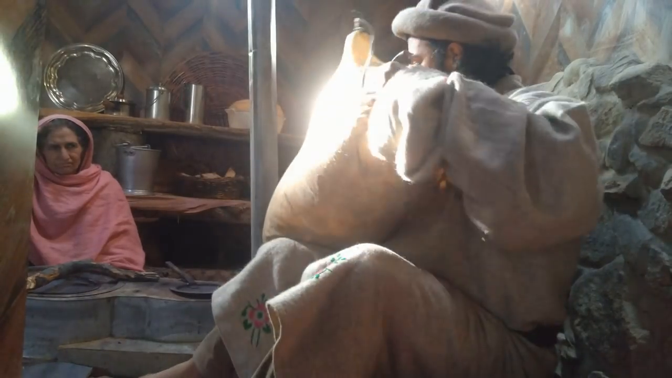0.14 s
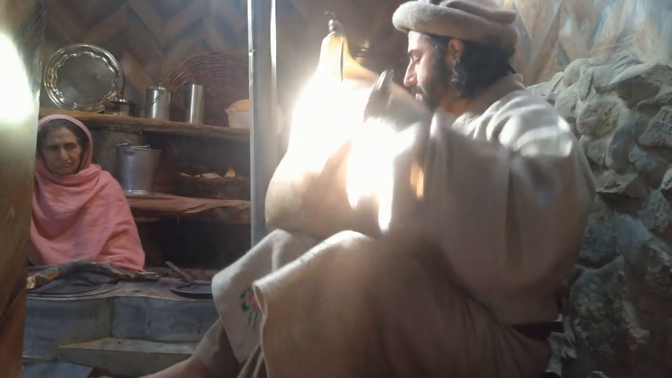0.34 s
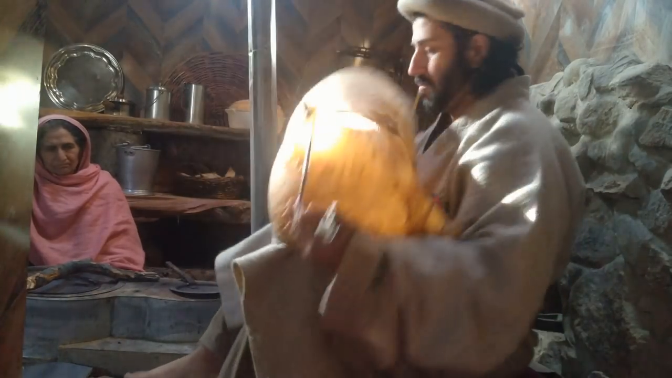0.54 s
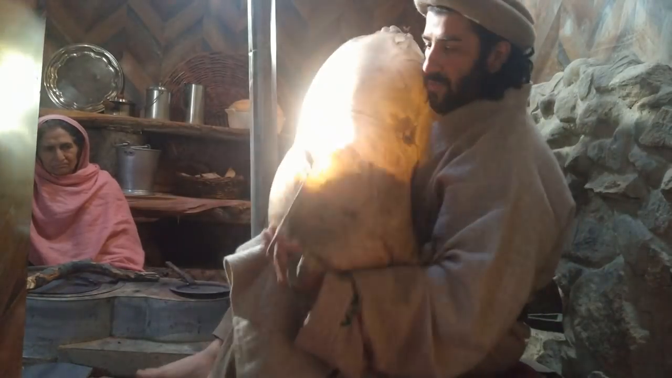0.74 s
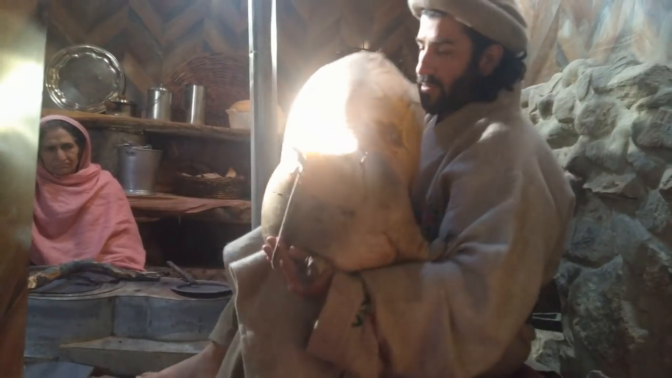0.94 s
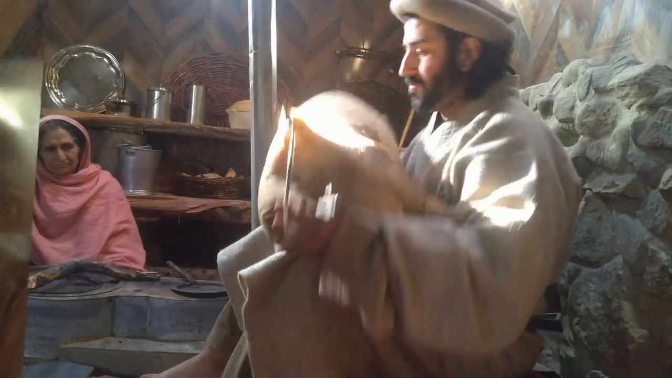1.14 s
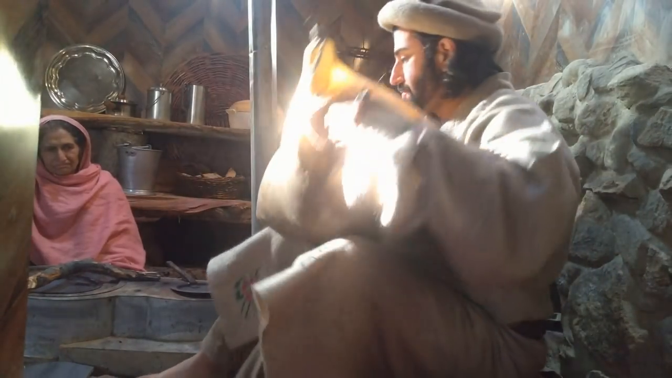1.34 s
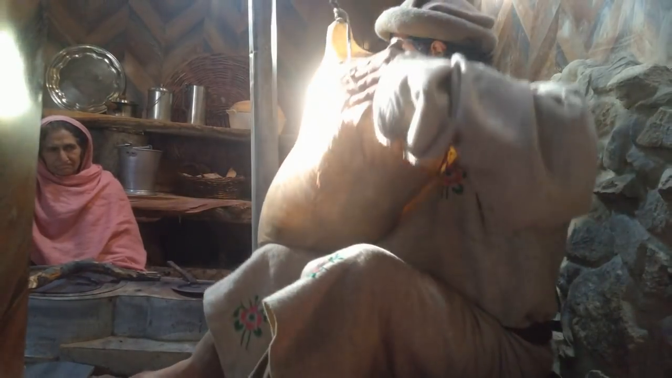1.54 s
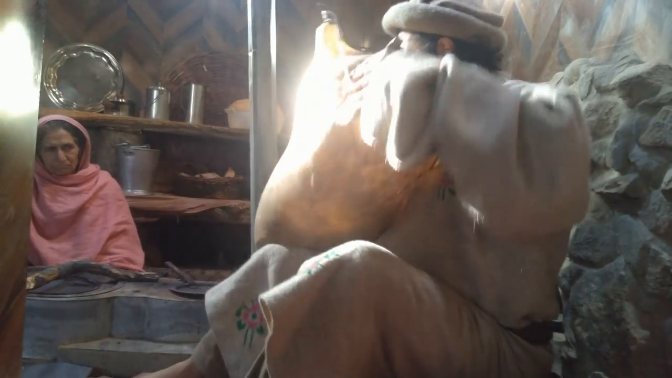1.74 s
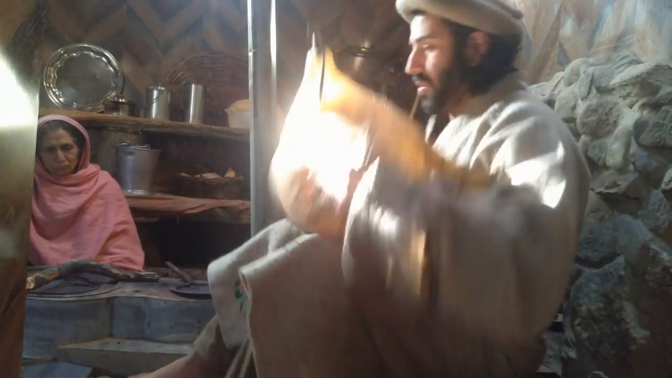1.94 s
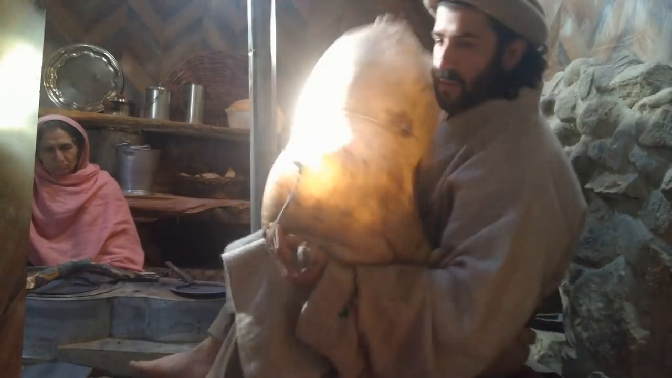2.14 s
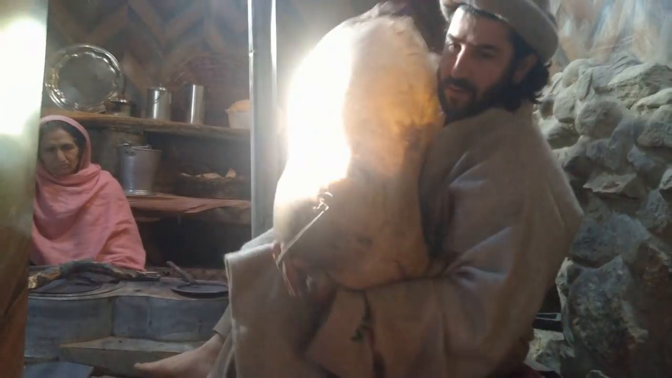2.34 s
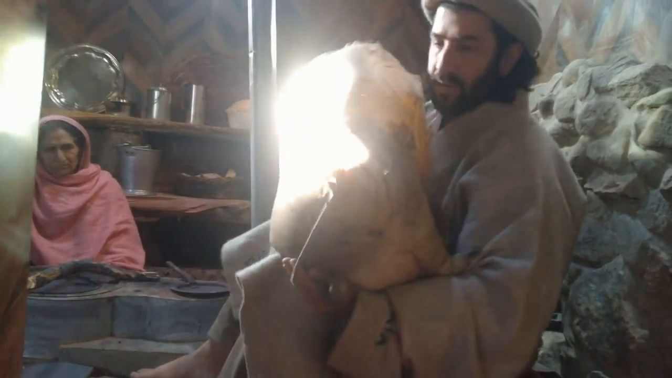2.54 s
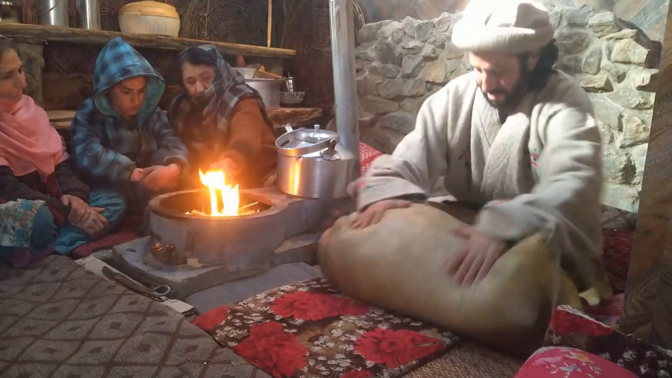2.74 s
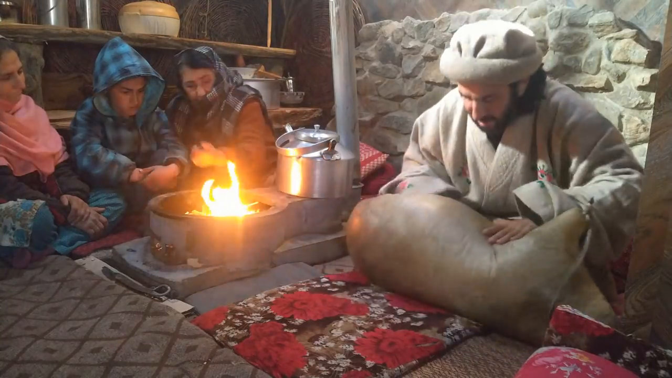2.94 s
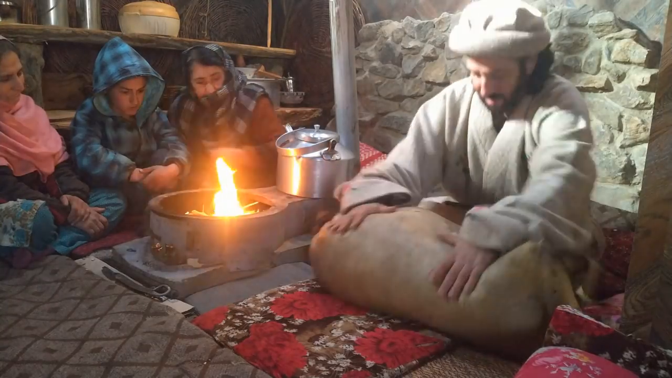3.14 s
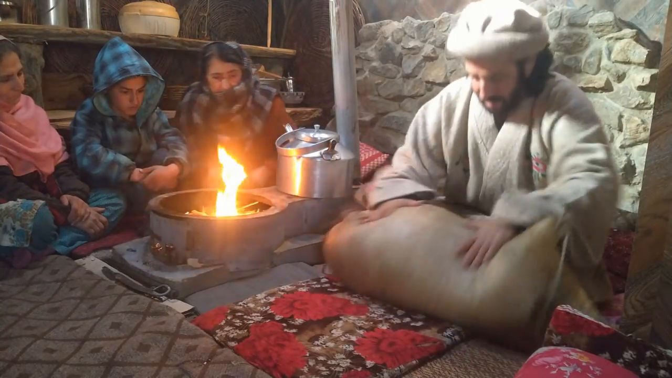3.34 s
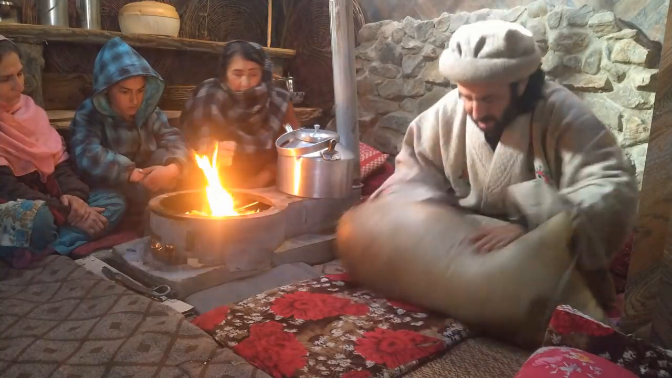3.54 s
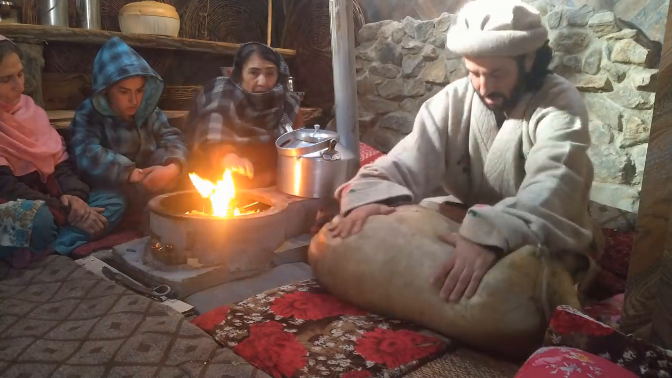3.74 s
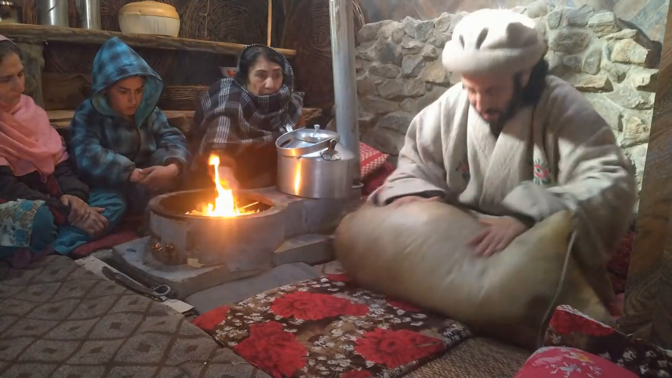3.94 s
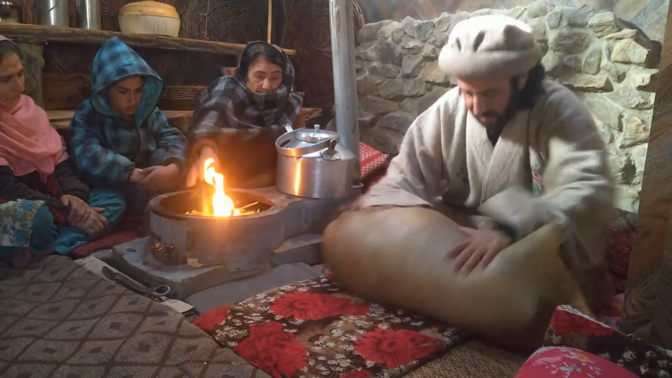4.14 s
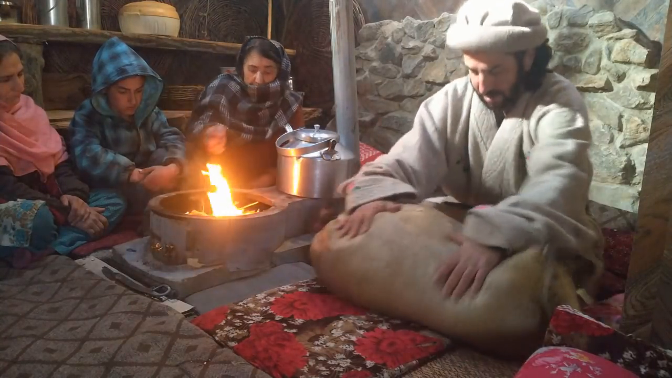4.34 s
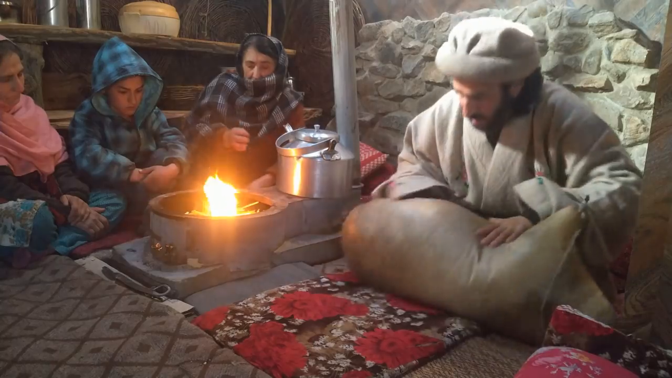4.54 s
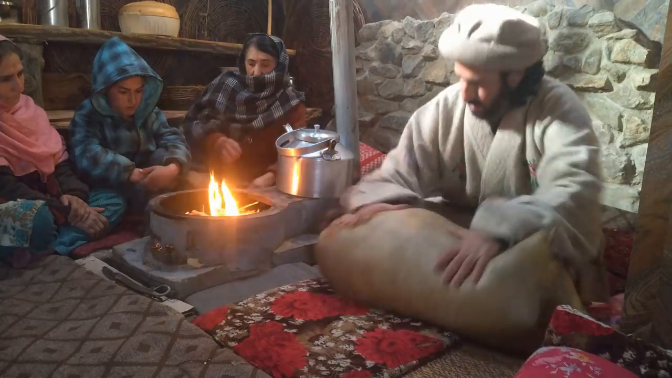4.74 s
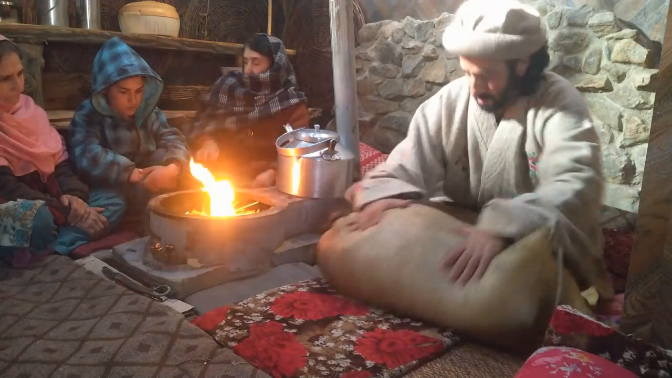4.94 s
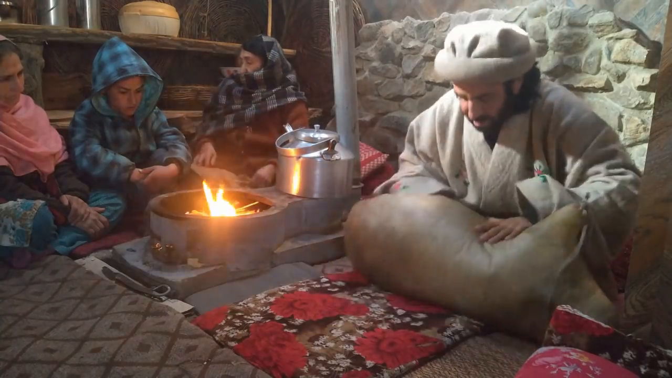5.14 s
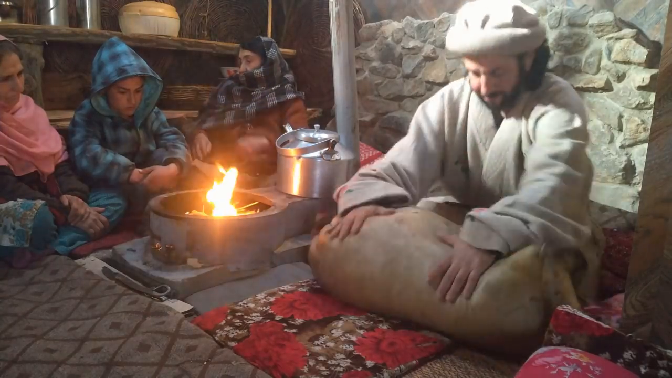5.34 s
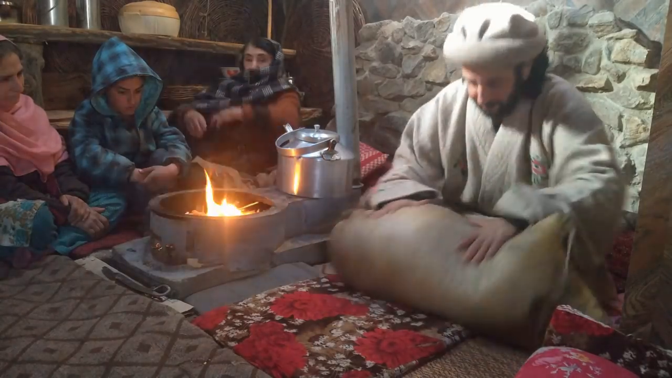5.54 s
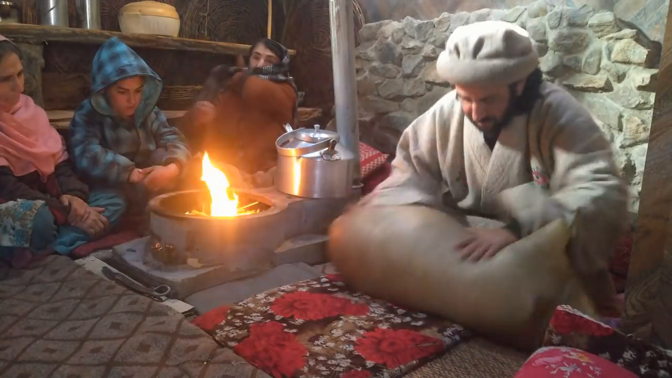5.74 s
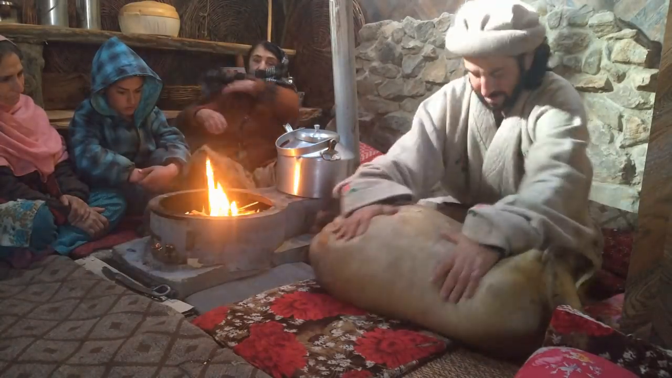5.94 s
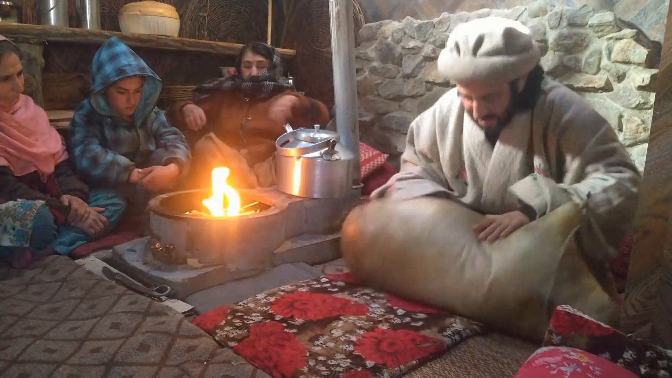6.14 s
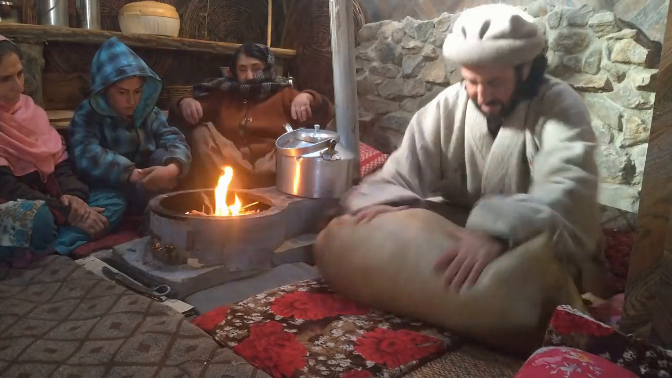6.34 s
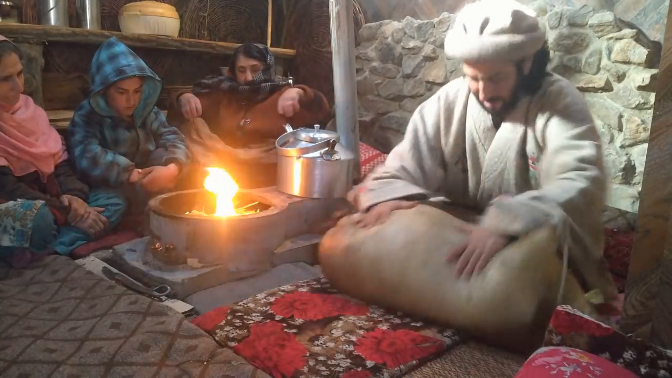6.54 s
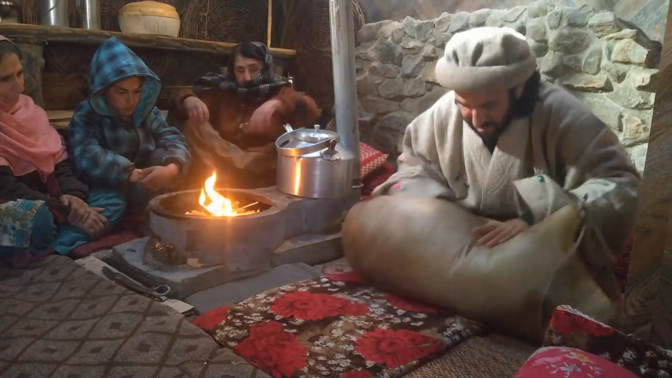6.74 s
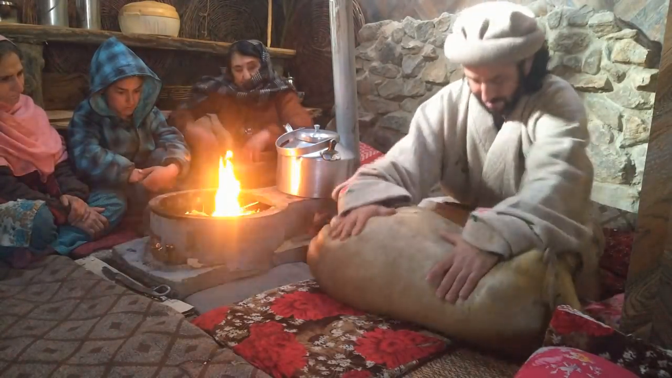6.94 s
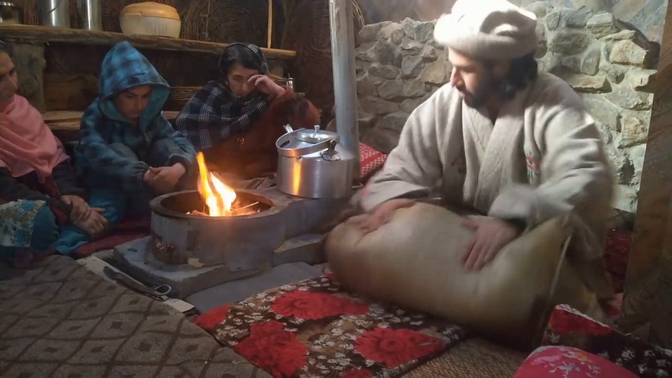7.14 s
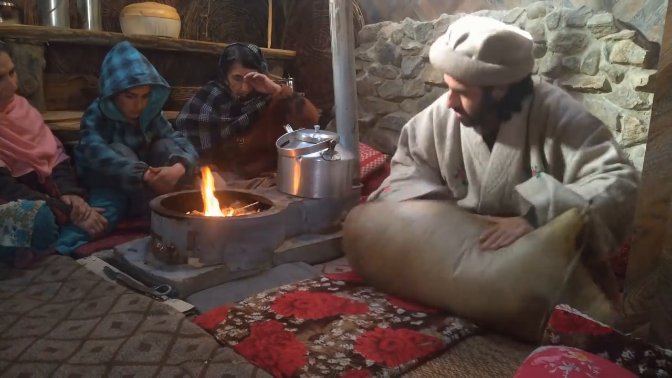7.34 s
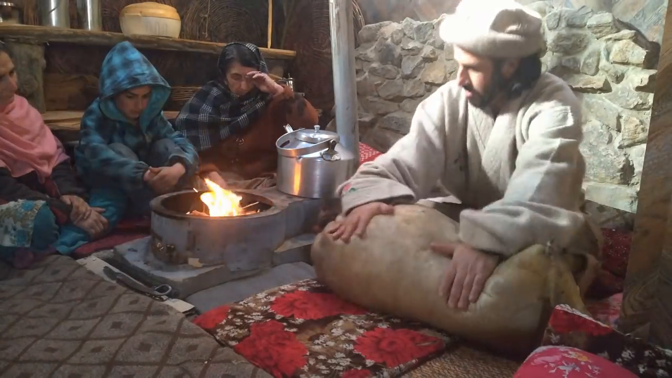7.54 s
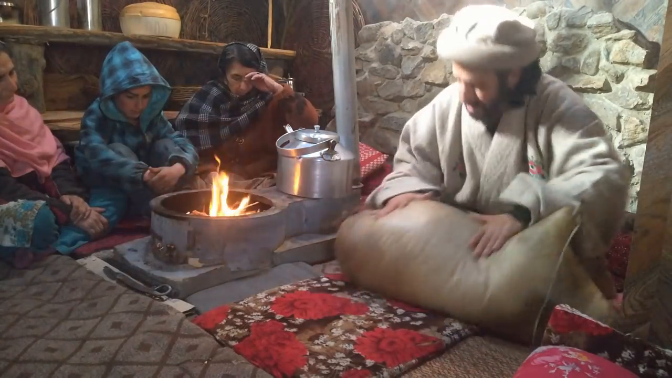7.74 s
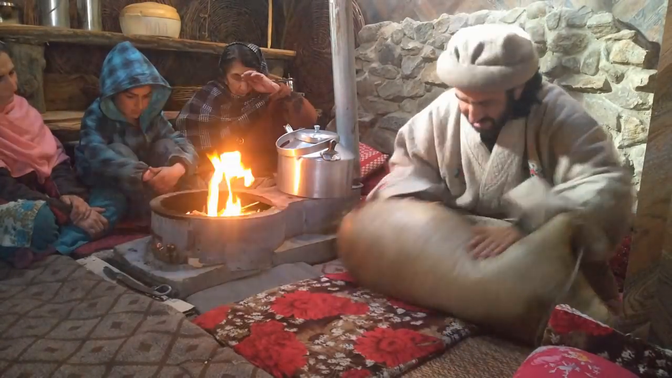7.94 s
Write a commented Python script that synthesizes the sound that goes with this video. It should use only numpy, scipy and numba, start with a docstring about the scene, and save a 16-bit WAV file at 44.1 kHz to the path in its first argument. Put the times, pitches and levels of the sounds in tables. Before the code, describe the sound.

Liquid sloshes in a leather skin bag, tipped slowly on the knees, then rocked faster with deep gulps and slaps in a small quiet room.

```python
"""Liquid churns in a skin bag in a small quiet room: tipped to and fro on the knees, then rocked faster on the floor.
Its trapped air is swarms of dying sine bubbles: deep gulps, a middling splash with gurgles, and fine froth,
all swelling with each stroke. Waves slap the skin as runs of pressure knocks with ringing skin and spray.
Lone bubbles plop and the leather crackles with short noise ticks. Wall echoes, low room resonances
and faint coloured-noise air surround the bag."""
import sys
import numpy as np
from scipy import signal
from scipy.fft import rfft, irfft
from scipy.io import wavfile
from scipy.ndimage import uniform_filter1d
from numba import njit

SR = 44100
rng = np.random.default_rng(int(sys.argv[2]) if len(sys.argv) > 2 else 0)


def materialize(psi):
    """Save the field psi as 16-bit PCM at rate SR to the path in sys.argv[1].

    A 1-D psi becomes a single channel; in a 2-D psi each row is a channel.
    """
    bounded = np.clip(np.atleast_2d(psi).T, -1, 1)
    quanta = np.round(bounded * 32767).astype(np.int16)
    wavfile.write(sys.argv[1], SR, quanta)


N = 357210
TIME = np.arange(N) / SR
FLOOR_FROM_S = 2.64  # from here on the bag lies on the floor


def from_db(db):
    """Decibels to gain."""
    return 10 ** (np.asarray(db) / 20)


def rms_one(x):
    """Scale to unit rms."""
    return x / np.sqrt(np.mean(x ** 2) + 1e-20)


def at_hz(points, hz):
    """Gain of a spectrum, drawn as straight dB lines over log frequency."""
    known_hz, db = np.transpose(points)
    return from_db(np.interp(np.log(np.maximum(hz, 1)), np.log(known_hz), db))


def coloured(x, points):
    """Filter a whole signal with a fixed spectrum."""
    return irfft(rfft(x) * at_hz(points, np.fft.rfftfreq(N, 1 / SR)), N)


def band(x, low_hz, high_hz, order=2):
    """Causal band-pass."""
    sos = signal.butter(order, [low_hz, high_hz], "band", fs=SR, output="sos")
    return signal.sosfilt(sos, x + 1e-18)


def evened(x, span_s):
    """Hold the slow level of a swarm at 1, keeping its grain."""
    size = max(int(span_s * SR), 2)
    power = uniform_filter1d(uniform_filter1d(x * x, size), size)
    return x / np.sqrt(np.abs(power) + 1e-20)


@njit
def bubbles(start, size, hz, t60, rise):
    """Each bubble is a dying sine; a positive rise lifts its pitch as it nears the surface."""
    out = np.zeros(N)
    for k in range(len(start)):
        length, phase = int(t60[k] * SR), 0.
        for i in range(min(length, N - start[k])):
            age = i / length
            phase += 2 * np.pi * hz[k] * (1 + rise * age) / SR
            out[start[k] + i] += size[k] * np.exp(-np.log(1000.) * age) * np.sin(phase)
    return out


def cloud(low_hz, high_hz, count, cycles, spread_db, rise):
    """A swarm of bubbles of random moment, pitch, size and damping, with equal power per Hz."""
    when, pitch, size, damping, sign = rng.random((count, 5)).T
    starts = (when * N).astype(np.int64)
    hz = low_hz * (high_hz / low_hz) ** pitch
    sizes = hz * from_db(-spread_db * np.log(np.maximum(size, .01))) * np.sign(sign - .5)
    t60 = cycles * 2 ** (2 * damping - 1) / hz  # half to double the given cycles
    return bubbles(starts, sizes, hz, t60, float(rise))


# spectrum of the still room: (f/Hz, relative level/dB)
AIR_COLOUR = [(20, -22), (50, -28), (120, -29), (500, 12), (2000, -3), (4200, -24), (8400, -22),
              (12000, -27), (15700, -18)]
AIR_DB = -59


def room_air():
    """Still air is steady noise with the colour of the room."""
    return from_db(AIR_DB) * rms_one(coloured(rng.standard_normal(N), AIR_COLOUR))


def room_echoes(x, t60_s=0.28, level_db=-15, first_echo_s=0.0044, shift_s=.4, count=3):
    """Dense wall reflections, soon soaked up by rugs; their pattern shifts as the liquid moves about."""
    age, wet = TIME[:SR // 2], np.zeros(N)
    for k in range(count):
        decay = from_db(-60 * age / t60_s) * (age > first_echo_s)
        tail = band(rng.standard_normal(len(age)) * decay, 130, 10000)
        tail = tail / np.sqrt(np.sum(tail ** 2))
        # each pattern fades in and out in turn
        nearness = np.sqrt(2 / count) * np.cos(TIME / shift_s * np.pi + np.pi * k / count)
        wet += signal.fftconvolve(x * nearness, tail)[:N]
    return from_db(level_db) * wet


# low resonances of the small room: (f/Hz, width f/Hz, level/dB)
STANDING_WAVES = [(119.4, 16, -14.5), (250, 5.7, -5.5), (303.3, 16.4, 1.5)]


def room_boom(x):
    """Standing waves between the walls ring on a little after each gulp."""
    boom = np.zeros(N)
    for hz, width_hz, db in STANDING_WAVES:
        b, a = signal.iirpeak(hz, hz / width_hz, fs=SR)
        boom += from_db(db) * signal.lfilter(b, a, x)
    return boom


# bright spectrum shared by froth and leather crackle: (f/Hz, relative level/dB)
BRIGHT_COLOUR = [(2800, 1.5), (3300, -3), (4100, -12), (5000, -11.5), (6600, -14.5), (8400, -9.5),
                 (9600, -18.5), (12000, -25.5), (14000, -20.5), (15700, -15)]


def brightened(x):
    """Fine froth and snapping leather get the same bright colour."""
    return coloured(x, BRIGHT_COLOUR)


# creases of leather snapping: (t/s, relative level/dB)
LEATHER_SNAPS = [(.72, -51), (2.151, -37), (2.162, -40), (2.17, -35.5), (2.597, -41)]


def leather_creases(snap_s=0.0059, level_db=-7):
    """A crease gives way with a short bright tick: noise under a sudden, dying envelope."""
    snaps = np.zeros(N)
    for s, db in LEATHER_SNAPS:
        first = int(s * SR)
        snaps[first:] += from_db(db + level_db) * np.exp(-TIME[:N - first] / snap_s)
    crackle = rms_one(band(brightened(rng.standard_normal(N)), 4200, 21550))
    return band(snaps * crackle, 1600, 19000, order=4)


# lone large bubbles: (t/s, relative level/dB, starting pitch f/Hz, 60 dB decay t/s)
LONE_BUBBLES = [(.095, -29, 560, .12), (.187, -26.5, 510, 0.031), (0.431, -36.5, 402, 0.18),
                (0.931, -30, 327, 0.096), (1.126, -30, 460, 0.079), (1.722, -36.5, 328, 0.25),
                (1.795, -31.5, 416, 0.13), (2.055, -29.5, 595, 0.077), (2.152, -27.5, 618, 0.053),
                (2.91, -25.5, 229.6, 0.31), (6.209, -22, 233.4, 0.23)]


def plops(rise=0.056):
    """Single large bubbles break loose as the liquid turns over."""
    s, db, hz, t60 = np.transpose(LONE_BUBBLES)
    ringing = bubbles((s * SR).astype(np.int64), from_db(db), hz, t60, float(rise))
    return band(ringing, 124, 910)


# colour of the bag on the knees, then on the floor: (f/Hz, relative level/dB)
KNEES_COLOUR = [(60, -19), (100, -0.5), (130, 4), (210, -3), (330, -2), (440, -5), (570, -3.5), (740, -10),
                (1100, -11.5), (2000, -18), (2800, -20.5)]
FLOOR_COLOUR = [(60, -25.5), (92, -5), (125, -2), (180, 3), (270, -2), (400, -8), (480, -12), (700, -12.5),
                (1000, -16.5), (1600, -18), (2800, -22.5)]


def through_skin(x):
    """The bag colours what rings inside it, one way on the knees and another on the floor."""
    return np.where(TIME < FLOOR_FROM_S, coloured(x, KNEES_COLOUR), coloured(x, FLOOR_COLOUR))


# waves hitting the skin: (t/s, relative level/dB, central skin pitch f/Hz)
SKIN_HITS = [(0.073, -28, 330), (.899, -21, 98), (1.378, -34, 130), (1.416, -36, 400), (1.547, -26, 300),
             (1.614, -29, 116), (2.313, -29, 150), (2.461, -30, 114), (3.74, -17.5, 119),
             (3.885, -18.5, 128), (4.269, -21, 148), (4.824, -30, 222), (5.377, -8.5, 107),
             (6.927, -24, 170), (6.951, -15, 109), (7.127, -18, 99), (8.082, -19, 160)]


def slaps(gap_s=0.0075, fade_s=0.03, skin_cycles=5, skin_db=-9, knock_db=-2, knock_s=0.00064,
          rebound_s=0.0023, spray_db=-23, spray_s=0.062, count=5):
    """A wave lands as a ragged run of pressure knocks that ring the slack skin and throw a burst of spray."""
    skin, knocks, burst = np.zeros((3, N))
    for s, db, hz in SKIN_HITS:
        gaps, sizes, pitches = rng.uniform(0.53, 1.41, (3, count))
        delay = gap_s * (np.cumsum(gaps) - gaps[0])
        at = ((s + delay) * SR).astype(np.int64)
        force = from_db(db) * np.sqrt(sizes) * np.exp(-delay / fade_s)
        pitch_hz = hz * np.sqrt(pitches)
        skin += bubbles(at, -force, pitch_hz, skin_cycles / pitch_hz, 0.)
        knocks[at[at < N]] += force[at < N]
        spray_age = np.minimum(TIME[:max(N - at[0], 0)], 1)
        burst[at[0]:] += from_db(db + spray_db) * np.exp(-spray_age / spray_s)
    # each knock is a pointed push followed by the pull of the rebound
    lag = np.arange(-SR // 100, SR // 100) / SR
    push_pull = np.exp(-np.abs(lag) / knock_s) - np.exp(-np.abs(lag - rebound_s) / knock_s)
    thump = from_db(knock_db) * signal.fftconvolve(knocks, push_pull, "same") + from_db(skin_db) * skin
    drops = through_skin(cloud(380, 1950, count=12000, cycles=0.85, spread_db=4.5, rise=0))
    spray = evened(band(drops, 430, 2270, order=4), 0.04)
    return band(thump, 81, 1600, order=3) + burst * spray


def swell(start_s, end_s, attack_s, release_s):
    """Exponential attack, hold and release of one wave; it belongs either to the knees or to the floor."""
    away = np.maximum(start_s - TIME, 0) / attack_s + np.maximum(TIME - end_s, 0) / release_s
    same_place = (TIME < FLOOR_FROM_S) == (start_s < FLOOR_FROM_S)
    return np.exp(-np.minimum(away, 20)) * same_place


# the liquid piles up at one end and breaks: (crest t/s, swell time constant t/s, ebb time constant t/s,
# splash level/dB, gulp level/dB and froth level/dB, both relative to the splash)
BREAKING_SURGES = [(0.097, 0.051, 0.083, -35, -9, -37), (0.905, 0.028, 0.03, -31.0, -12, -10.5),
                   (0.979, 0.041, 0.032, -32.0, -7, -12.5), (1.431, 0.042, 0.044, -40, 1.5, -20.5),
                   (1.549, 0.033, 0.1, -40, -14, -13), (1.615, 0.045, 0.071, -36.0, -4.5, -19),
                   (2.321, 0.013, 0.1, -28.0, -10, -13.5), (2.371, 0.029, 0.029, -26.5, 1, -25),
                   (2.698, 0.052, 0.053, -31.5, 0.5, -15), (2.925, 0.006, 0.074, -35.5, -5, -19),
                   (3.223, 0.043, 0.066, -33.5, 4.0, -15.5), (3.461, 0.01, 0.095, -33, -5, -19.0),
                   (3.758, 0.067, 0.066, -32.5, 3.5, -19), (3.904, 0.045, 0.063, -39.5, 6, -1),
                   (4.305, 0.035, 0.044, -29.5, 3, -17.0), (4.844, 0.041, 0.078, -32.0, 2.5, -15.5),
                   (5.086, 0.031, 0.067, -31, -3, -14.0), (5.404, 0.033, 0.081, -29.5, 0.5, -17.5),
                   (5.632, 0.03, 0.066, -31, 2, -15.5), (5.931, 0.071, 0.058, -32.5, 5, -15),
                   (6.461, 0.052, 0.064, -32, 3.0, -16.5), (6.729, 0.062, 0.041, -33, 0, -13.5),
                   (6.96, 0.025, 0.13, -34, 6.5, -12.5), (7.139, 0.011, 0.032, -34.5, 13, -4.5),
                   (7.279, 0.059, 0.055, -36, 2, -12.5), (7.6, 0.038, 0.08, -31.0, 3.5, -15.5),
                   (8.102, 0.02, 0.06, -36.5, 11.5, -13)]
# the liquid runs back along the skin: (start t/s, length t/s,
# splash level/dB, gulp level/dB and froth level/dB, both relative to the splash)
RUNNING_BACKWASHES = [(0.068, 0.3, -47.5, -6, -15), (0.708, 0.35, -42, -2.0, -21),
                      (1.72, 0.19, -47.0, 1.0, -16.5), (2.11, 0.14, -46, -0.5, -19.5),
                      (2.43, 0.12, -40.5, -0.0, -25), (2.831, 0.11, -36.5, 5.5, -9),
                      (3.358, 0.12, -39.5, 2.5, -7.5), (3.64, 0.078, -47, -1.0, -7),
                      (3.91, 0.13, -37.0, -1.5, -13), (4.469, 0.11, -36.0, 2.5, -10),
                      (4.998, 0.083, -42.0, 8.5, -8), (5.53, 0.11, -41.0, 4, -5.5),
                      (6.06, 0.16, -37.0, 3.0, -10.5), (6.62, 0.043, -39.0, 7, -7),
                      (7.21, 0.1, -36.5, -4, -10.5), (7.75, 0.14, -37.0, 1.0, -9)]
# restlessness between strokes, on the knees and on the floor: (gulp level/dB, splash level/dB, froth level/dB)
KNEES_REST = (-55.5, -55, -70.5)
FLOOR_REST = (-44, -53.5, -69)


def churning(wash_attack_s=0.039, wash_release_s=0.065, gather_db_per_s=24.5):
    """Strength of gulps, splash and froth: surges, backwashes and resting motion add up in power."""
    knees_rest, floor_rest = from_db(KNEES_REST)[:, None], from_db(FLOOR_REST)[:, None]
    power = np.where(TIME < FLOOR_FROM_S, knees_rest, floor_rest) ** 2
    for s, swell_s, ebb_s, db, gulp_db, froth_db in BREAKING_SURGES:
        wave = from_db(db) * swell(s, s, swell_s, ebb_s)
        power += np.outer(from_db([gulp_db, 0, froth_db]), wave) ** 2
    for s, length_s, db, gulp_db, froth_db in RUNNING_BACKWASHES:
        wave = from_db(db) * swell(s, s + length_s, wash_attack_s, wash_release_s)
        # a running wash traps ever more big bubbles; the froth does not gather
        progress_s = np.clip(TIME - s, 0, length_s) - length_s / 2
        gathering = wave * from_db(gather_db_per_s * progress_s)
        power += np.array([gathering * from_db(gulp_db), gathering, wave * from_db(froth_db)]) ** 2
    return np.sqrt(power)


def slosh(clump_db=0.68, clump_hz=22, gurgle_db=-5, gulp_db=-2.5, splash_db=-2, froth_db=1.0):
    """Trapped air of every size swells and ebbs with each stroke, in clumps as the wave folds over."""
    gulping, splashing, frothing = churning()
    clumps = clump_db * rms_one(band(rng.standard_normal(N), clump_hz / 2, clump_hz * 2))

    gulps = through_skin(cloud(65.1, 374, count=1400, cycles=7.4, spread_db=3.0, rise=0.39))
    gulps = evened(band(gulps, 77, 310, order=4), 0.026)

    splash = through_skin(cloud(325.3, 3050, count=24000, cycles=12.4, spread_db=1.5, rise=0.26))
    splash = evened(band(splash, 307.4, 2280, order=4), 0.024)
    # a few longer-ringing bubbles stand out of the splash as gurgles
    gurgles = through_skin(cloud(328.6, 1197, count=900, cycles=23, spread_db=2.0, rise=0.15))
    splash = splash + from_db(gurgle_db) * evened(gurgles, 0.21)

    froth = brightened(cloud(2030, 18400, count=90000, cycles=5.0, spread_db=0.5, rise=.05))
    froth = evened(band(froth, 1360, 21550, order=4), 0.035)

    # the splash clumps twice as strongly in dB as the gulps and the froth
    return (gulps * gulping * from_db(gulp_db + clumps / 2)
            + splash * splashing * from_db(splash_db + clumps)
            + froth * frothing * from_db(froth_db + clumps / 2))


def scene(bag_db=1.29):
    """The bag in its room, with echoes, boom and still air."""
    bag = from_db(bag_db) * (slosh() + slaps() + plops() + leather_creases())
    return (bag + room_boom(bag) + room_echoes(bag) + room_air())[None]


def record(dry, cutoff_hz=15900):
    """A steep low-pass cuts the top."""
    return signal.sosfilt(signal.ellip(12, .2, 70, cutoff_hz, fs=SR, output="sos"), dry)


dry = scene()
out = record(dry)
materialize(out)
```